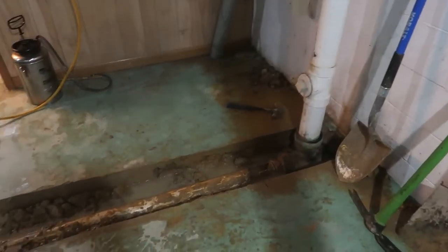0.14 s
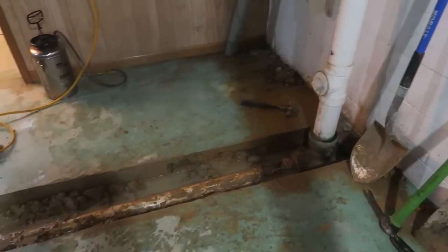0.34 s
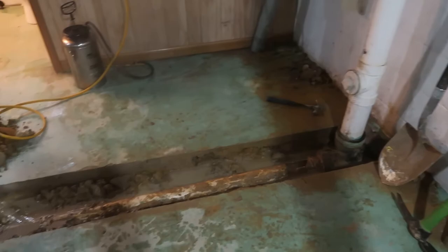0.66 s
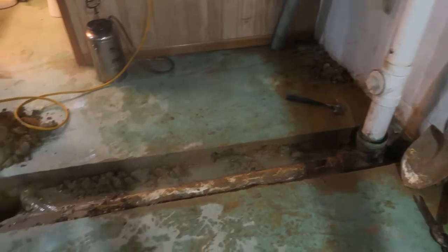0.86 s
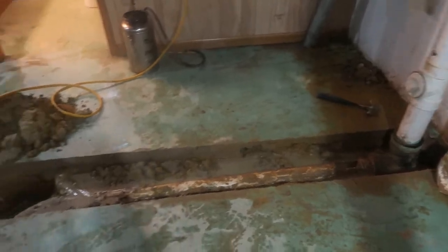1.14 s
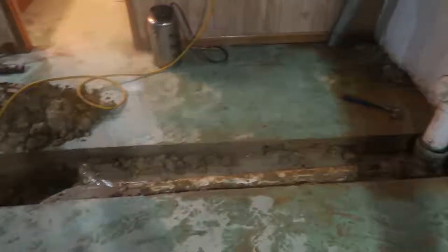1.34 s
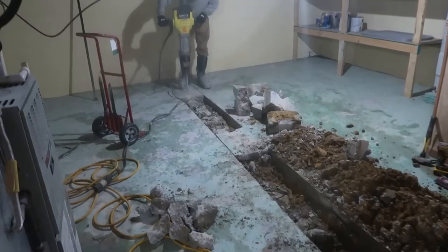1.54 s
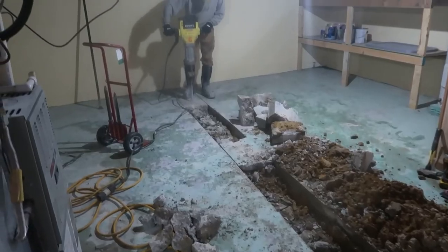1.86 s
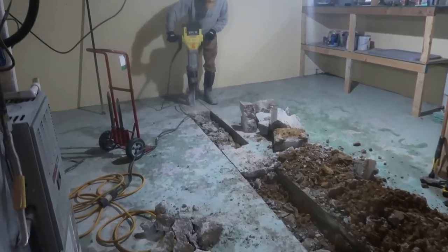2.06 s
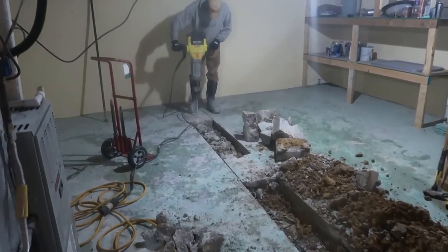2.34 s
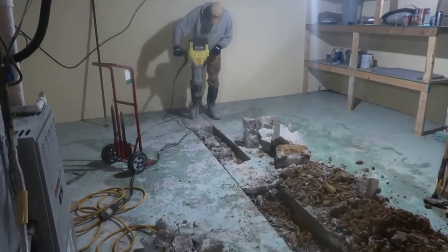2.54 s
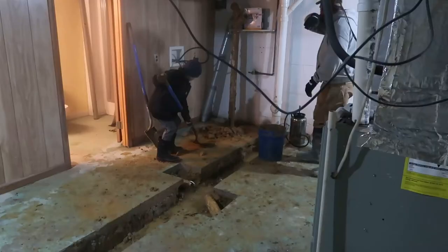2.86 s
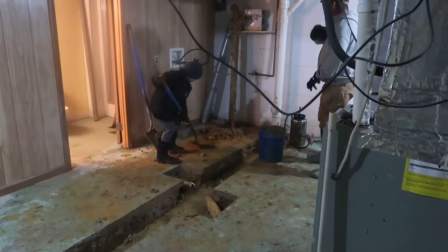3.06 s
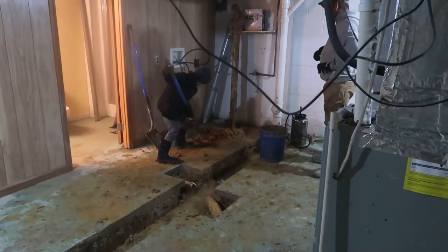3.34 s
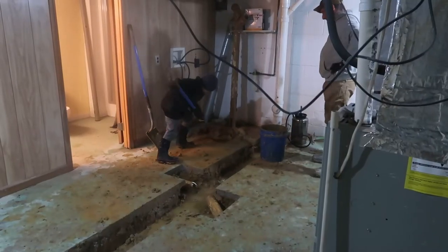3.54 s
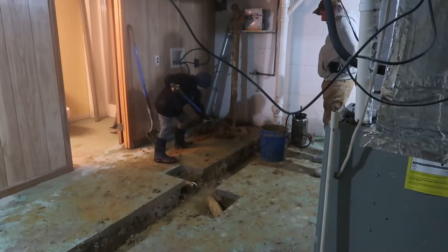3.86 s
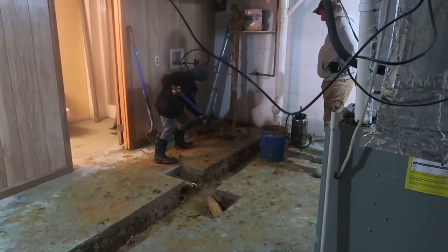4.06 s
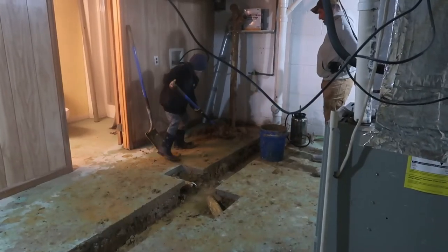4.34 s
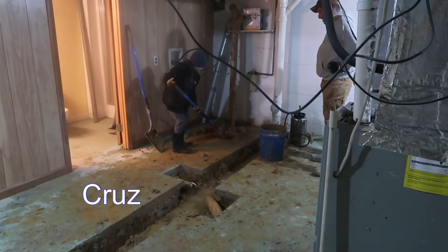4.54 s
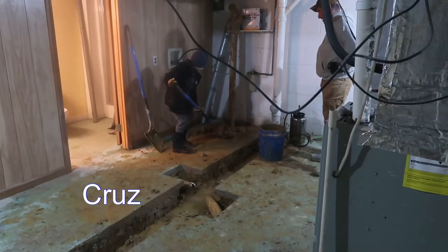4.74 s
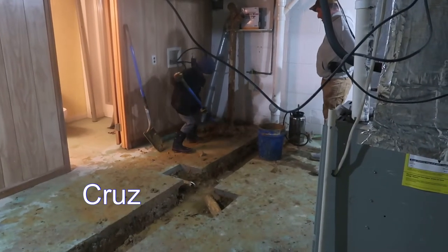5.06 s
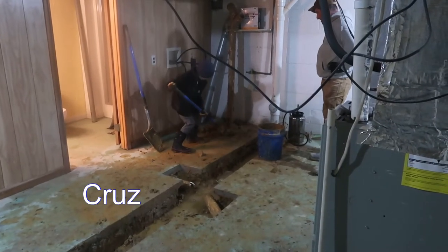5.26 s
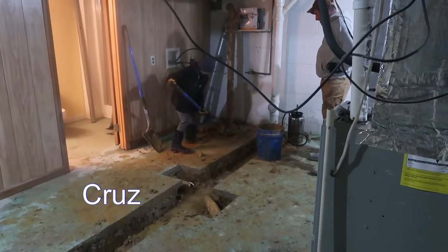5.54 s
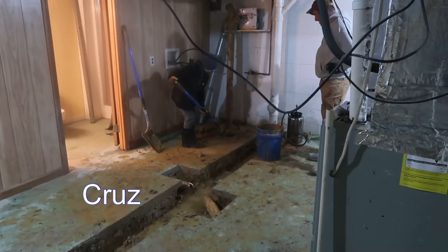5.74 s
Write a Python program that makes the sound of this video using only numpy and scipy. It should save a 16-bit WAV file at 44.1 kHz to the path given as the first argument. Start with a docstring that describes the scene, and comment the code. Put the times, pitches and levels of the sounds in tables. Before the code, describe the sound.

A bare basement with hard, echoing walls, heard through two closely spaced microphone ports. From 0 s an electric breaker hammers concrete at roughly 14.5 even blows a second, loud and blurred by reflections from round a corner. Steel clangs, mostly near 4 kHz, mix with gritty crushing, housing clatter, a 10 kHz whistle and a thin wavering singing tone. At 1.39 s the sound switches abruptly to the same room: blows are sharper and more separate, some clanging harder. At 2.87 s it stops dead, leaving a short bump and faint low air. A shovel stirs gravelly soil, a small knock at 3.25 s, then the strongest scrape and stony cracks at 3.5 to 3.7 s, with skids and sliding grit dying away. Quiet shifting follows, with soft knocks and rasps around 4.45 to 4.7 s, a light scrape near 5.2 s, and a duller knock with grit at 5.8 s.

```python
"""A bare, echoing basement: an electric breaker hammers the concrete floor, about 14.5 blows a second.
It is heard from round a corner, then at 1.39 s abruptly from within the same room.
Each blow rings the modes of the steel chisel, crushes concrete in noisy grains and shakes the housing.
At 2.87 s it stops dead; a shovel then scrapes, skids and knocks in the stony soil of a trench,
made of shaped clicks and noise over faint air. Two close microphone ports hear it all."""
import sys
import numpy as np
from scipy import signal
from scipy.fft import rfft, irfft, next_fast_len
from scipy.io import wavfile
from scipy.ndimage import uniform_filter1d, minimum_filter1d

SR = 44100
rng = np.random.default_rng(int(sys.argv[2]) if len(sys.argv) > 2 else 0)


def output_pcm(signal):
    """Save a mono or channel-first signal as 16-bit PCM at the path in sys.argv[1].

    Samples are clipped to [-1, 1] before scaling.
    """
    pcm = np.clip(np.atleast_2d(signal).T, -1, 1) * 32767
    wavfile.write(sys.argv[1], SR, np.round(pcm).astype(np.int16))


N = 260631
TIME = np.arange(N) / SR
MOVE_S, STOP_S = 1.39, 2.872  # the microphone is in the room from MOVE_S; the breaker stops at STOP_S


def amp(db):
    """Decibels to gain."""
    return 10 ** (np.asarray(db) / 20)


def unit(x):
    """Scale to rms 1."""
    return x / np.sqrt(np.mean(x ** 2))


def fade(t60, size=N):
    """Exponential decay that loses 60 dB in t60 seconds."""
    return np.exp(-np.log(1000) * TIME[:size] / t60)


def gains(points, size=N):
    """Gain of a (Hz, dB) spectrum at each frequency bin."""
    hz, db = np.transpose(points)
    bins_hz = np.fft.rfftfreq(size, 1 / SR)
    return amp(np.interp(np.log(bins_hz + 1), np.log(hz), db))


def colour(x, points):
    """Give x a (Hz, dB) spectrum; rms 1."""
    size = next_fast_len(len(x), True)
    shaped = irfft(rfft(x, size) * gains(points, size), size)
    return unit(shaped[:len(x)])


def coloured_noise(points, size=N):
    """Steady noise with a (Hz, dB) spectrum; rms 1."""
    return colour(rng.standard_normal(size), points)


def grains(rate, spread_db, size=N):
    """Stony clicks at random, rate a second, mostly small and a few large; rms 1."""
    chance = rng.random(size)
    sizes = amp(spread_db * np.minimum(rng.exponential(size=size), 4))
    signs = rng.choice([-1, 1], size)
    return unit((chance < rate / SR) * sizes * signs)


def add(track, s, sound):
    """Mix a sound into a track at time s."""
    start = int(np.clip(s * SR, 0, len(track) - 1))
    track[start:start + len(sound)] += sound[:len(track) - start]


# How firmly the bit bears on the slab. Each row: time in seconds, change of blow level in dB.
BIT_BEARING = [(0, -4.5), (0.19, -2), (0.27, -4.5), (0.37, -5), (0.47, -0.5), (0.59, -3), (0.68, -1.5),
               (1.3, -3), (1.42, 0), (1.74, -1), (1.84, -6), (1.9, -2), (1.97, -1), (2.33, 1.5),
               (2.65, -2.5), (2.86, 0)]
# Each place's beat: time of one blow in seconds, blows a second.
CORNER_BEAT, ROOM_BEAT = (0.0521, 14.468), (1.4185, 14.585)
TIMING_SLOP_S = 0.001  # standard deviation
# An ordinary blow at each place: chisel ring, crushed concrete, clang near 4.2 kHz, all relative dB.
CORNER_BLOW, ROOM_BLOW = (-16, -25, -27), (-11.5, -25, -27.5)
BLOW_SPREAD_DB = (1.2, 0.7, 1.4)  # standard deviation from blow to blow, same columns


def hammer(beat, ordinary, start, end):
    """Blows on a steady beat, each a little different: rows (s, ring dB, crush dB, clang dB)."""
    first, rate = beat
    times = first + np.arange(np.floor((start - first) * rate), (end - first) * rate) / rate
    chance = rng.standard_normal((len(times), 1 + len(ordinary)))
    bearing = np.interp(times, *np.transpose(BIT_BEARING))
    levels = ordinary + chance[:, 1:] * BLOW_SPREAD_DB + bearing[:, None]
    return np.column_stack([times + TIMING_SLOP_S * chance[:, 0], levels])


# The bit lands hard or askew and a note clangs out. Each row: time in seconds, note in Hz, extra dB.
CLANGING_NOTES = [(0.12, 2640, 9), (0.12, 5950, 12), (0.19, 2640, 19), (0.19, 7900, 7), (0.26, 4200, 6.5),
                  (0.26, 7900, 12.5), (0.40, 5950, 16.5), (0.47, 5950, 0), (0.47, 7900, 1), (0.74, 7900, 0),
                  (0.88, 7900, 0), (1.02, 2640, 19), (1.16, 7900, -1), (1.36, 4200, 10), (1.36, 5950, 7),
                  (1.56, 7900, 15), (1.62, 7900, 14), (1.76, 7900, 9), (1.97, 4200, 10.5), (2.04, 5950, 2),
                  (2.04, 7900, 10), (2.45, 2640, 6), (2.52, 4200, 11.5), (2.58, 4200, 18), (2.58, 5950, 7),
                  (2.65, 2640, 9), (2.72, 2640, 14), (2.72, 4200, 11), (2.72, 7900, 12), (2.79, 4200, 14),
                  (2.86, 4200, 13)]
NOTE_WIDTH = .04  # modes within this fraction of the note join in


def clangs(times, hz):
    """Extra dB that each blow, landing hard or askew, gives to the steel's mode at hz."""
    extra = np.zeros(len(times))
    period = np.diff(times).mean()
    for s, note_hz, extra_db in CLANGING_NOTES:
        this_blow = np.abs(times - s) < period / 2
        extra += extra_db * this_blow * (abs(hz / note_hz - 1) < NOTE_WIDTH)
    return extra


# Modes of the steel chisel. Each row: pitch in Hz, ring t60 in seconds,
# relative level in dB round the corner, relative level in dB in the room.
CHISEL_MODES = [(1375, 0.039, -6.5, -14.5), (2636, 0.05, -3.5, -4.5), (4151, 0.05, 13, 14.5),
                (4269, 0.04, 13.5, 12.5), (5406, 0.06, -2.5, -12), (5890, 0.053, 3.5, 4.5),
                (5960, 0.046, -3, -1), (6212, 0.045, 1.5, -1.5), (7908, 0.07, 0.5, 1.5),
                (8473, 0.065, 2, 1), (9878, 0.08, 10, 1), (10092, 0.09, 8.5, 1), (10951, 0.1, -3, -4),
                (12164, 0.08, -4, -3), (13636, 0.08, -7, -12), (14364, 0.1, 0, -6)]
# The whistling pair of modes near 10 kHz builds as the bit sinks. Each row: time in seconds, extra dB.
WHISTLE_LEVEL = [(0, -2), (.4, -5), (.8, -1), (1.2, 5), (1.36, 3), (1.44, 0)]
# The grip of the concrete on the bit. Each row: flutter rate in Hz, relative level in dB.
GRIP = [(4, -11), (20, 2.5), (50, -14), (150, -50), (1000, -100)]


def chisel(blows, mode_db, scatter_db, rattle_db, contact_t60, waver_hz, flutter_db, size=SR // 20):
    """Each blow shares itself anew among the modes; the bit's rattle in its hole keeps them going."""
    times, ring_db, _, clang_db = blows.T
    t = TIME[:int(times[-1] * SR) + size]
    push = fade(contact_t60, size) * (1 - np.exp(-TIME[:size] / 0.00075))
    push /= push.sum()
    rattle = grains(250, 5.3)[:len(t)] / np.sqrt(np.diff(times).mean() * SR)
    latest = np.maximum(np.searchsorted(times, t) - 1, 0)  # the blow that each sample follows
    grip = coloured_noise(GRIP)
    whistle_db = np.interp(times, *np.transpose(WHISTLE_LEVEL))
    out = np.zeros(N)
    for (hz, t60, *_), db in zip(CHISEL_MODES, mode_db):
        # how the bit is seated decides how much its clanging and whistling modes take
        drive_db = clang_db if 3800 < hz < 4550 else ring_db + whistle_db * (9300 < hz < 10500)
        share, turn, detune = rng.standard_normal((len(times), 3)).T
        # complex, so that each blow starts the mode at its own phase
        force = amp(rattle_db + drive_db)[latest] * np.roll(rattle, rng.integers(N)) + 0j
        strengths = amp(drive_db + clangs(times, hz) + scatter_db * share) * np.exp(2j * np.pi * turn)
        for s, strength in zip(times, strengths):
            add(force, s, strength * push)
        swing = signal.lfilter([1], [1, -np.exp(-np.log(1000) / (t60 * SR))], force)
        # the changing grip of the concrete bends each mode's pitch a little and makes it flutter
        phase = 2 * np.pi * np.cumsum(hz + waver_hz * np.interp(t, times, detune)) / SR
        flutter = flutter_db * np.roll(grip, rng.integers(N))[:len(t)]
        add(out, 0, amp(db + flutter) * np.real(swing * np.exp(1j * phase)))
    return signal.sosfilt(signal.butter(4, 900, "highpass", fs=SR, output="sos"), out)


# Crushed concrete and housing clatter. Each row: frequency in Hz,
# relative level in dB round the corner, relative level in dB in the room.
CRUSH_SPECTRA = [(30, -40, -33), (90, -23, -25), (129, -30, -21.5), (175, -11.5, -10), (223, -5, -9.5),
                 (298, -2.5, 3.5), (454, 4, -1), (560, -3, 1), (740, 1.5, 3.5), (1020, -2.5, 3),
                 (1300, 2, 2.5), (2000, 1, 2), (3080, 2.5, 0.5), (3620, 0, 4), (6200, 7.5, 3),
                 (7020, -4.5, -3), (10900, -35, -2.5), (15000, -19, -35)]
# Uneven crumbling. Each row: rate in Hz, relative level in dB.
CRUMBLING = [(10, -24), (50, -5.0), (160, -10.5), (500, -23), (2000, -90)]
CHIP_DB, CHIP_T60_S = -3.5, 0.011  # chip of an ordinary blow against its crush; clanging adds to it


def concrete(blows, spectrum, crush_t60, rebound_db, clatter_db, crumble_db, size=SR // 6):
    """Concrete crumbles and chips under each blow; the tool bounces once, the housing clatters on."""
    force = np.zeros(N)
    crush = fade(crush_t60, size)
    chip = fade(CHIP_T60_S, size)
    hard = clangs(blows[:, 0], CHISEL_MODES[2][0])  # a blow that clangs near 4.2 kHz chips more
    for (s, _, crush_db, *_), hard_db in zip(blows, hard):
        add(force, s, amp(crush_db) * (crush + amp(CHIP_DB + hard_db) * chip))
        add(force, s + rng.uniform(0.0082, 0.05), amp(crush_db + rebound_db) * crush)
    clatter = amp(clatter_db + np.interp(TIME, blows[:, 0], blows[:, 2]))
    force = np.hypot(force, clatter)
    crumble = amp(crumble_db * coloured_noise(CRUMBLING))
    return colour(grains(8000, 2.3) * crumble * force, spectrum) * np.sqrt(np.mean(force ** 2))


# The singing mode comes and goes. Each row: time in seconds, level in dB.
SINGING_LEVEL = [(0, -46), (.08, -20.5), (.13, -38), (.18, -36), (.24, -24), (.31, -18.5), (.39, -37),
                 (.46, -21.5), (.68, -23.5), (.8, -29.5), (.98, -22), (1.1, -32), (1.16, -22.5), (1.3, -31),
                 (1.45, -29), (1.6, -35), (1.69, -28), (1.93, -33.5), (2.05, -23.5), (2.33, -33),
                 (2.42, -28), (2.54, -27), (2.73, -27.5), (2.86, -34)]
SINGING_HZ, SINGING_WAVER_HZ, SINGING_FLUTTER_DB = 4884, 15, 2.6  # waver and flutter are rms
# Each row: rate of wavering in Hz, relative level in dB.
WAVERING = [(25, 0), (100, -24), (1000, -90)]


def singing():
    """Rubbing in its hole keeps one chisel mode singing between blows, wavering in pitch and level."""
    waver, flutter = coloured_noise(WAVERING), coloured_noise(WAVERING)
    phase = 2 * np.pi * np.cumsum(SINGING_HZ + SINGING_WAVER_HZ * waver) / SR
    db = np.interp(TIME, *np.transpose(SINGING_LEVEL)) + SINGING_FLUTTER_DB * flutter
    port_phase = np.array([[1], [-1]]) * np.pi / 4  # the two ports hear it a quarter cycle apart
    return amp(db) * np.sqrt(2) * np.sin(phase + port_phase)


def echoes(t60, treble_t60, size=SR):
    """Dense reflections from bare walls; the treble dies first."""
    noise = rfft(rng.standard_normal(size))
    low = 1 / (1 + (np.fft.rfftfreq(size, 1 / SR) / 3500) ** 2)
    tail = irfft(noise * low) * fade(t60, size)
    tail += irfft(noise * (1 - low)) * fade(treble_t60, size)
    tail *= 1 - np.exp(-TIME[:size] / 0.00034)
    return tail / np.sqrt(np.sum(tail ** 2))


def basement(x, side, wet_db, t60, treble_t60, size=2 ** 19):
    """Direct sound and echoes at two close ports: alike in the bass, out of step in the treble."""
    wet = amp(wet_db)
    # mid and side hear the same sound through separate echoes
    mid, diff = (rfft(x + wet * signal.fftconvolve(x, echoes(t60, treble_t60))[:N], size)
                 for _ in range(2))
    ratio = gains(side, size)
    ports = mid + np.array([[1j], [-1j]]) * ratio * diff
    ports /= np.sqrt((1 + ratio ** 2) * (1 + wet ** 2))
    return irfft(ports)[:, :N]


# Side against mid at the two microphone ports, round the corner.
# Each row: frequency in Hz, side minus mid in dB.
CORNER_PORTS = [(1300, -84), (2400, -17.5), (4400, -2), (6000, 6), (8100, 6.5), (14000, 27.5)]
# The same in the room with the breaker. Each row: frequency in Hz, side minus mid in dB.
ROOM_PORTS = [(1300, -61), (2400, -25.5), (4400, -7), (8100, 1.5), (11000, 4.5), (14000, 9)]


def breaker():
    """Hammering steel and concrete: blurred by echo round the corner, sharper blows in the room."""
    modes, crush = np.transpose(CHISEL_MODES), np.array(CRUSH_SPECTRA)
    far = hammer(CORNER_BEAT, CORNER_BLOW, 0, MOVE_S)
    near = hammer(ROOM_BEAT, ROOM_BLOW, MOVE_S, STOP_S)
    corner = amp(-6.5) * chisel(far, modes[2], scatter_db=5.0, rattle_db=-1.5, contact_t60=0.016,
                                waver_hz=9.54, flutter_db=4.5)
    corner += amp(8.5) * concrete(far, crush[:, :2], crush_t60=0.14, rebound_db=-8,
                                  clatter_db=-17.5, crumble_db=2.0)
    room = amp(-10.0) * chisel(near, modes[3], scatter_db=4.0, rattle_db=1.5, contact_t60=0.0069,
                               waver_hz=9.2, flutter_db=3.56)
    room += amp(8) * concrete(near, crush[:, ::2], crush_t60=0.11, rebound_db=-18.5,
                              clatter_db=-10.0, crumble_db=5.0)
    corner = basement(corner, CORNER_PORTS, wet_db=2.5, t60=1.0, treble_t60=0.4)
    room = basement(room, ROOM_PORTS, wet_db=0.5, t60=1.0, treble_t60=0.26)
    return (np.where(TIME < MOVE_S, corner, room) + singing()) * (TIME < STOP_S)


# Still air in the basement. Each row: frequency in Hz, relative level in dB per Hz.
AIR_SPECTRUM = [(15, -35), (25, -1), (96, 4), (380, 0), (554, -3), (780, -0.5), (1150, -7.5), (2940, -15.5),
                (10700, -20), (12300, -25), (14000, -70)]
AIR_DB, AIR_SIDE_DB = -50.5, -8  # level of the air; its side against that


def still_air():
    """The faint, steady noise of the basement's air."""
    return amp(AIR_DB) * coloured_noise(AIR_SPECTRUM)


# Dull bumps in the bass. Each row: time in seconds, level in dB, t60 in seconds.
DULL_BUMPS = [(2.876, -48.5, 0.5), (2.989, -46, .25), (3.258, -44, 0.4), (4.127, -51, 0.3),
              (5.043, -42, .15), (5.791, -42, 0.2)]
# Each row: frequency in Hz, relative level in dB.
BUMP_SPECTRUM = [(20, -20), (50, 18), (90, 12), (170, -4), (600, -58), (4000, -90)]


def bumps(size=SR // 2):
    """Soft bumps low in the bass: decaying bursts of deep noise."""
    out = np.zeros(N)
    for s, db, t60 in DULL_BUMPS:
        add(out, s, amp(db) * fade(t60, size) * coloured_noise(BUMP_SPECTRUM, size))
    return out


SWELL_DB = 16  # a stroke rises by this much during its swell


def effort(peak_s, swell_s, t60):
    """A stroke swells to full force, then dies away."""
    since = TIME - peak_s
    swell = amp(SWELL_DB * np.minimum(since, 0) / swell_s)
    return swell * np.exp(-np.log(1000) * np.maximum(since, 0) / t60)


# Shovel strokes in the trench. Each row: time of full force in seconds, swell in seconds,
# release t60 in seconds, blade grinding in relative dB, sliding grit in relative dB.
SHOVEL_STROKES = [(2.878, 0.038, 0.24, -35.5, -43), (3.055, 0.068, 0.73, -67, -48.5),
                  (3.26, 0.093, 1.14, -36.5, -37.5), (3.43, 0.091, .8, -26, -41),
                  (3.51, 0.063, 0.73, -18, -33), (3.62, 0.14, 1.02, -24, -39),
                  (4.15, 0.24, 0.37, -47.5, -59.5), (4.36, 0.47, 1.3, -48.5, -49),
                  (4.62, 0.13, 0.65, -45, -49.5), (4.79, .15, 1.1, -55, -53), (5.04, 0.042, 0.56, -72, -45),
                  (5.2, 0.12, 0.76, -33, -49), (5.595, 0.038, 0.5, -72, -44),
                  (5.789, 0.018, 0.55, -40.5, -37)]
# The blade in stony soil. Each row: frequency in Hz, relative level in dB.
GRIND_SPECTRUM = [(59, -55), (100, -40), (243, -15.5), (299, -4), (512, -1.5), (859, -0.5), (1150, -12),
                  (1270, -3.5), (1380, -8.5), (2520, -11), (3900, -20), (10500, -63), (14000, -90)]
# Loose grit. Each row: frequency in Hz, relative level in dB.
GRIT_SPECTRUM = [(200, -34), (900, -10), (2500, 4.5), (5500, 2.5), (8500, -2), (12000, -5), (15000, -33)]
# Small jerks of the blade. Each row: rate in Hz, relative level in dB.
JERKS = [(5, 27), (25, 10), (70, -17), (200, -46), (1000, -90)]
SHIFTING_DB = (-60, -72)  # soil keeps shifting between strokes: grinding, grit, in relative dB


def shovel():
    """The blade grinds over stones in small jerks while fine grit slides off it."""
    power = amp(SHIFTING_DB)[:, None] ** 2
    for peak_s, swell_s, t60, grind_db, grit_db in SHOVEL_STROKES:
        power = power + np.outer(amp([grind_db, grit_db]), effort(peak_s, swell_s, t60)) ** 2
    grinding, sliding = np.sqrt(power)
    jerks = amp(4.0 * coloured_noise(JERKS) - 2.5)
    grind = grinding * jerks * colour(grains(3500, 3.8), GRIND_SPECTRUM)
    grit = sliding * amp(1.0) * colour(grains(3000, 1.3), GRIT_SPECTRUM)
    return grind + grit


# Knocks of shovel and clods in the trench. Each row: time in seconds, thud in relative dB,
# stony crack in relative dB, thud pitch in Hz, crack pitch in Hz.
TRENCH_KNOCKS = [(3.038, -62, -47, 201, 2500), (3.255, -42, -46, 170, 1200),
                 (3.275, -29.5, -48, 288.4, 900), (3.33, -37, -46, 290, 900), (3.487, -21, -16, 420, 1050),
                 (3.499, -22.5, -32, 350, 1500), (3.535, -31, -23.5, 233, 920), (3.645, -45, -27, 405, 796),
                 (3.703, -37, -28.5, 536, 740), (4.119, -71, -51, 206, 870), (4.455, -32.5, -48, 416, 700),
                 (4.456, -31.5, -48, 182, 700), (4.554, -41, -54, 370, 704), (4.598, -35, -40.5, 385, 1600),
                 (4.696, -38, -61, 407, 800), (5.016, -66, -49, 400, 4070), (5.155, -54, -47, 450, 780),
                 (5.211, -55, -44, 386, 1300), (5.783, -33, -34.5, 320, 1930),
                 (5.788, -30.5, -45, 578, 750), (5.804, -22.5, -38, 270.6, 750),
                 (5.898, -35, -53, 323, 800)]
# The packed soil's response. Each row: multiple of the thud pitch, relative level in dB.
SOIL_THUD = [(.08, -29), (.25, -26), (.45, -8.5), (.66, -6), (1, -1), (1.4, -6.5), (2.4, -26), (4, -40),
             (12, -57)]
# Steel on stone. Each row: multiple of the crack pitch, relative level in dB.
STONE_CRACK = [(.15, -1), (.55, 5), (1, 9.5), (1.8, 6.5), (3.2, 3.5), (6, -9), (11, -11.5), (18, -52),
               (24, -62)]


def knocks(thud_t60, boom_db, boom_t60, crack_t60, tick_db, tick_t60, size=SR // 2):
    """A knock thumps the packed soil, booms at one pitch and cracks on stone with a sharp first tick."""
    out = np.zeros(N)
    snap = fade(crack_t60, size) + amp(tick_db) * fade(tick_t60, size)
    for s, thud_db, crack_db, thud_hz, crack_hz in TRENCH_KNOCKS:
        thud = coloured_noise(np.array(SOIL_THUD) * [thud_hz, 1], size) * fade(thud_t60, size)
        boom = np.sin(2 * np.pi * thud_hz * TIME[:size]) * fade(boom_t60, size)
        crack = colour(grains(6000, 1.4, size), np.array(STONE_CRACK) * [crack_hz, 1]) * snap
        thump = thud / np.sqrt(2) + amp(boom_db) * boom
        add(out, s, amp(thud_db) * thump + amp(crack_db) * crack)
    return signal.sosfilt(signal.butter(3, 75, "highpass", fs=SR, output="sos"), out)


# The blade's edge skids on a stone. Each row: time of full force in seconds, swell in seconds,
# release t60 in seconds, level in dB, pitch in Hz.
STONE_SKIDS = [(3.25, 0.037, 0.27, -49, 2650), (3.47, 0.1, .2, -35.5, 2440), (3.61, 0.083, 0.33, -21, 1970),
               (3.65, 0.08, 0.57, -23.5, 800), (4.61, 0.13, 0.13, -42, 407),
               (4.615, 0.055, 0.35, -38.5, 1980), (5.19, 0.14, 0.96, -37, 830),
               (5.22, 0.14, 0.5, -41.5, 2730), (5.27, 0.058, 0.49, -41, 1260)]
# A stone rasped by the blade. Each row: multiple of its pitch, relative level in dB.
STONE_RASP = [(.2, -35), (.65, -5.5), (1, -2), (1.4, -11.5), (2.2, -19), (6, -55)]


def skids():
    """The edge sticks and slips on a stone in sparse clicks; each stone rasps at its own pitch."""
    out = np.zeros(N)
    for peak_s, swell_s, t60, db, hz in STONE_SKIDS:
        rasp = colour(grains(700, 1.2), np.array(STONE_RASP) * [hz, 1])
        out += amp(db) * effort(peak_s, swell_s, t60) * rasp
    return out


# Side against mid at the microphone ports, by the trench.
# Each row: frequency in Hz, side minus mid in dB.
TRENCH_PORTS = [(60, -46), (200, -15), (500, -20), (1200, -23), (2400, -13), (4400, -5), (8100, 1),
                (15000, 6)]


def digging():
    """Shovel work over the faint noise of the basement, once the breaker has stopped."""
    air, air_side = still_air(), still_air()
    scrapes = basement(shovel() + skids() + air + bumps(), TRENCH_PORTS,
                       wet_db=-5.5, t60=0.58, treble_t60=0.21)
    blows = knocks(thud_t60=0.29, boom_db=-1.5, boom_t60=.2, crack_t60=0.19,
                   tick_db=-19.0, tick_t60=0.014)
    blows = basement(blows, TRENCH_PORTS, wet_db=-3.5, t60=0.7, treble_t60=0.7)
    wide_air = amp(AIR_SIDE_DB) * air_side * np.array([[1], [-1]])
    return (scrapes + blows + wide_air) * (TIME >= STOP_S)


def scene():
    """Breaking, then digging."""
    return breaker() + digging()


CEILING_DB, LIMITER_S = -3, .004  # the limiter's ceiling and the time it takes to act
TOP_HZ = 15300  # upper edge of the recorder's band


def record(dry):
    """The recorder's limiter turns both ports down together at loud peaks; a filter cuts the top."""
    size = int(LIMITER_S * SR)
    headroom = np.minimum(1, amp(CEILING_DB) / (np.abs(dry).max(axis=0) + 1e-9))
    gain = uniform_filter1d(minimum_filter1d(headroom, 2 * size), size)
    return signal.sosfilt(signal.ellip(8, .2, 70, TOP_HZ, fs=SR, output="sos"), dry * gain)


dry = scene()
out = record(dry)
output_pcm(out)
```